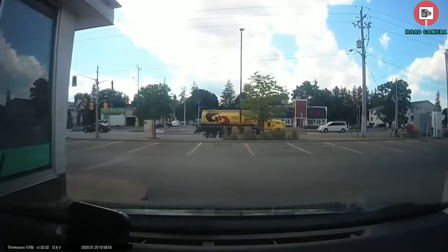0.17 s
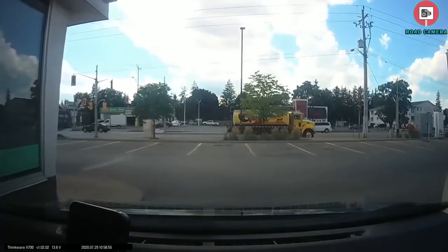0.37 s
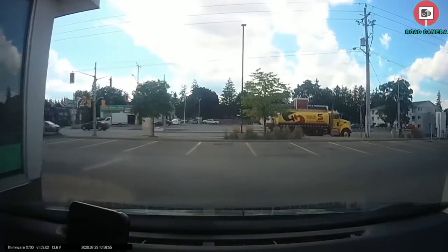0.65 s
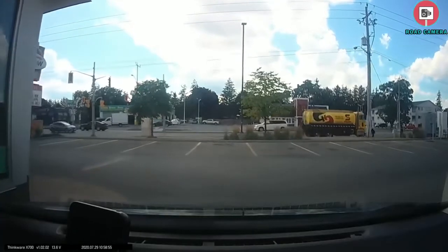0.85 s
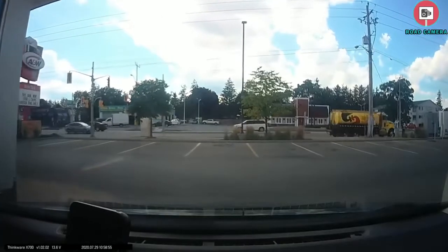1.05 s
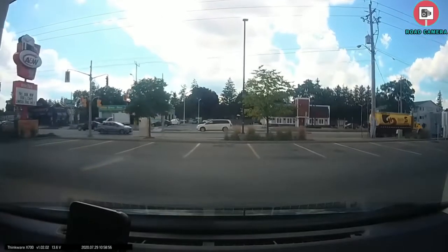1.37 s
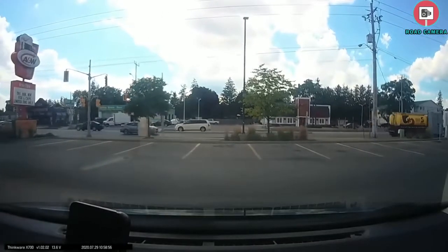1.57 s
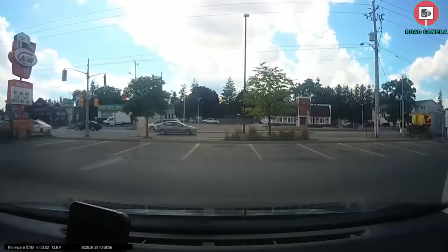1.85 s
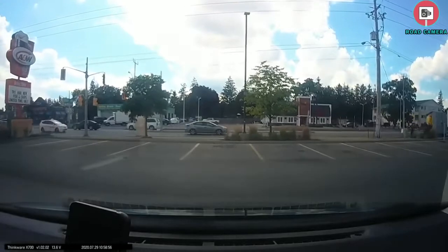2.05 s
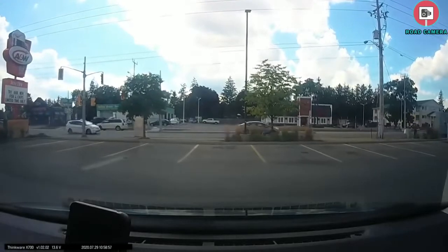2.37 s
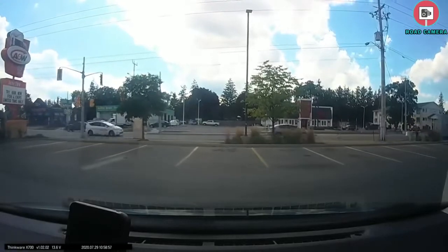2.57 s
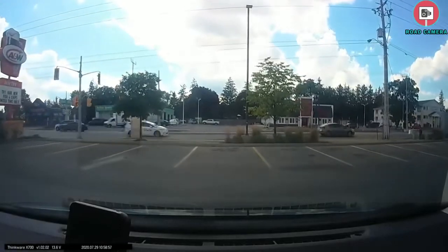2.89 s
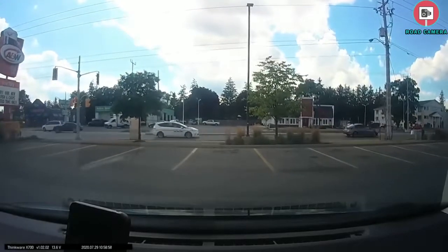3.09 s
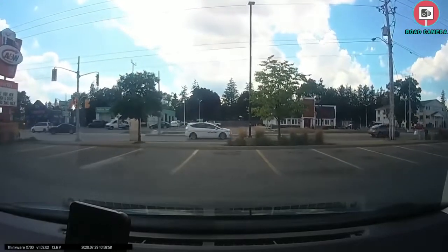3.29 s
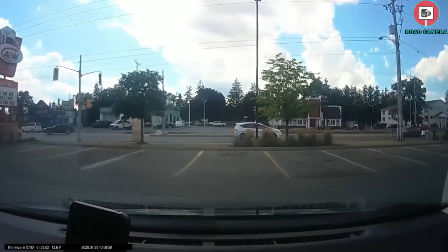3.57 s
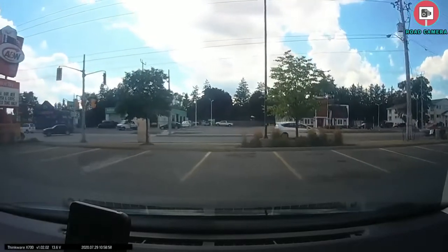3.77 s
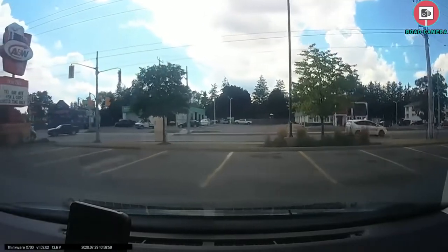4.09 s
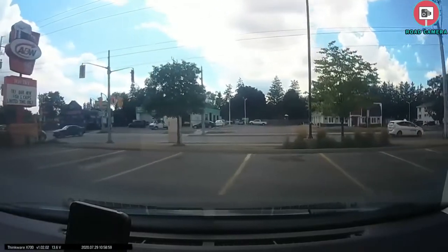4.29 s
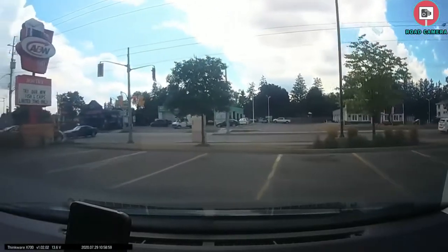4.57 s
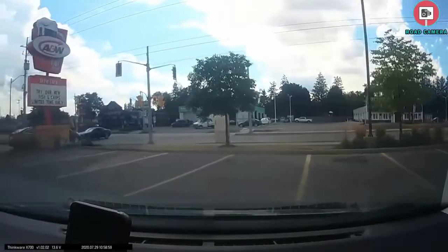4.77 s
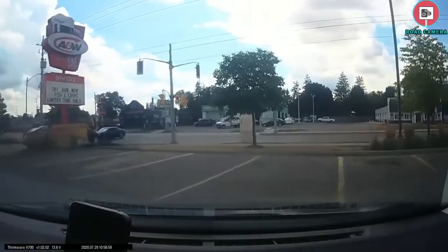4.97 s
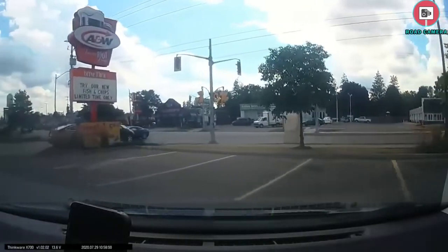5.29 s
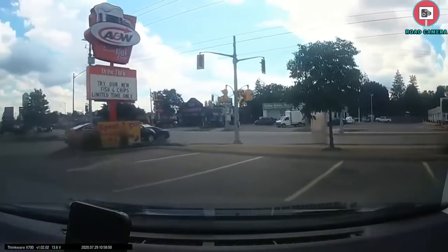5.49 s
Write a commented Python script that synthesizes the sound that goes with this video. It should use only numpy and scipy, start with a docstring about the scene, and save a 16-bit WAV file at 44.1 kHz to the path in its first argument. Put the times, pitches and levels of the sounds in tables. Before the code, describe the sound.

A loud tyre skid ends in a collision, heard through a microphone inside a nearby car. At first there is only the low cabin rumble, a soft engine drone, small plastic ticks and muffled traffic with a passing truck. After about four seconds, tyres outside chirp and build into a wavering, sinking screech. A bumper snaps, body panels crunch with a heavy thud, and the tyres squeal briefly again.

```python
"""A skid and a crash, heard from inside a car

Another car brakes hard. Its tyres stick and slip on the road, so they chirp, screech and fall in pitch.
Its bumper cracks, its body and panels crumple with a deep thud, and the tyres squeal once more.
Underneath, our slowly rolling car rumbles, its engine drones and its loose plastic trim ticks.
Traffic and a passing truck hum outside, and there is a faint hiss and an electrical whine."""
import sys
import numpy as np
from scipy import signal
from scipy.fft import rfft, irfft, next_fast_len
from scipy.io import wavfile
from scipy.ndimage import uniform_filter1d, map_coordinates

SR = 44100
rng = np.random.default_rng(int(sys.argv[2]) if len(sys.argv) > 2 else 0)


def file_out(sig):
    """Save sig as 16-bit WAV at sys.argv[1]."""
    # one column per channel
    cols = np.atleast_2d(sig).T
    # limit, then scale
    lim = np.clip(cols, -1, 1)
    pcm = np.round(lim * 32767).astype(np.int16)
    wavfile.write(sys.argv[1], SR, pcm)


N = 248811

# the skid: t/s, pitch/Hz, sliding force/dB (0 is full force), overtone boost/dB
SKID = [(4.0, 1150, -45.5, 3), (4.36, 1129, -33, -2), (4.47, 1080, -28, -1.5), (4.56, 1022, -25.5, 2),
        (4.66, 965, -11.5, 2.5), (4.71, 922, -5, -10.5), (4.77, 972, -3, -1.5), (4.84, 990, 0, 0),
        (4.9, 915.7, -2.5, -1.5), (4.95, 975, -4, 1), (4.99, 923, -6, 0), (5.04, 938, -8, 4),
        (5.09, 892, -9, 3), (5.15, 865, -11.5, 1), (5.21, 835, -17, 1.5), (5.27, 793, -21, 0),
        (5.32, 830, -22, -1), (5.42, 868, -23, 5)]
# each tyre: pitch ratio, level/dB, overtone/dB, pitch scatter/share,
# change in a light slide/dB, change once the car has slowed/dB
TYRES = [(1, -1.5, -3, .013, 0, 0), (1.052, -6.5, -4.5, .021, -2.5, -6), (.945, -7, -5.5, .018, -10, -2.5),
         (1.15, -11, -7, .028, -4, -4)]
# rubber tearing on asphalt: f/Hz, level/dB
SCRUB_SPECTRUM = [(1000, -79), (1900, -35.5), (2600, -0.5), (2900, -0.5), (3800, -2), (5000, -13),
                  (6500, -19.5), (8000, -20), (9500, -31), (10500, -39), (13000, -47), (15000, -61.5)]
# chattering tread: f/Hz, level/dB
RASP_SPECTRUM = [(300, -70.5), (660, -31), (740, -5.5), (850, 5.5), (1150, 5), (1500, -8), (1780, -10.5),
                 (2250, -8.5), (2600, -13.5), (4000, -43), (12000, -100)]
# a tyre catches briefly: t/s, length/s, pitch/Hz, level/dB, overtone against the note/dB
CHIRPS = [(4.035, 0.072, 1150, -44.5, -25), (4.127, 0.035, 1142, -48, -21), (4.2, 0.033, 1125, -40, -26),
          (4.25, 0.017, 1035, -40, -19), (4.271, 0.023, 1170, -36, -23.5), (4.583, 0.03, 996, -27.5, -21.5),
          (4.74, 0.017, 973, -22, -22.5), (4.829, 0.03, 1020, -26, -10.5), (4.93, 0.029, 1019, -26, -8),
          (5.243, 0.025, 807.6, -39, -3), (5.308, 0.043, 560, -45, -17.5), (5.549, 0.036, 962, -33.5, -20)]
# one tyre's rough squeal: t/s, pitch/Hz, level/dB
JUDDER = [(4.61, 870, -42.5), (4.70, 830, -38), (4.76, 788, -30.5), (4.80, 778, -37.5), (4.84, 795, -31),
          (4.88, 800, -38), (5.0, 785, -38.5), (5.04, 766, -46)]
# crash blows: t/s, thud/dB, panel/dB, splinter/dB, t60/s (the time to fade by 60 dB)
BLOWS = [(5.423, -20, -34, -45, 0.099), (5.431, -18.5, -31.5, -32.5, 0.048), (5.44, -16, -31, -42, 0.052),
         (5.45, -15.5, -21, -43, 0.045), (5.457, -26, -15.5, -35.5, 0.04), (5.466, -18, -26.5, -38, 0.067),
         (5.484, -30, -33.5, -45, 0.1), (5.498, -33, -33.5, -54, 0.18), (5.551, -39.5, -37.5, -56, 0.97)]
# ringing notes of the car body: f/Hz, width/Hz, level/dB
BODY_MODES = [(19.7, 19.4, 1.5), (44.2, 12, 2), (118, 26, -4.5), (193.3, 15, -5), (231, 21.6, -4.5),
              (311, 37, -10), (349, 25, -11.5)]
# ringing notes of the buckling panels: f/Hz, width/Hz, level/dB
PANEL_MODES = [(480, 68, -3.5), (595, 24, 4.5), (746, 27, 7), (887, 50, -0.5), (1086, 125, 1),
               (1270, 102, 1.5), (1455, 77, 0), (2070, 130, -7.5), (2320, 84, -5.5), (2650, 100, -13.5),
               (3310, 160, -14)]
# breaking plastic: f/Hz, level/dB
SPLINTER_SPECTRUM = [(1680, -40), (2400, -1), (3300, -2), (4200, -10), (5500, -12), (6200, -13),
                     (6800, -10), (7300, -19), (8200, -16), (10000, -24), (12000, -34), (15000, -41)]
# how the glass dulls body and panels: f/Hz, gain/dB
GLASS_MUFFLE = [(3000, 0), (6000, -7), (10000, -7), (15000, -45.5)]
# the bumper cracks before the metal gives way: t/s, level/dB
BUMPER_CRACKS = [(5.419, -49), (5.4285, -37), (5.433, -31.5), (5.437, -32)]
# ringing notes of the bumper shell: f/Hz, width/Hz, level/dB
BUMPER_MODES = [(1330, 130, 0), (1670, 110, -4), (2360, 100, -7), (3160, 210, -5.5), (3950, 77, -11.5),
                (5210, 110, -12), (6700, 190, -6.5), (7950, 120, -15.5), (9500, 130, -14.5)]
# deep notes of the cabin air: f/Hz, level/dB
AIR_MODES = [(19, -16.5), (48, -15.5)]
# the street's echo: f/Hz, t60/s
STREET_DECAY = [(100, 0.11), (1000, 0.43), (4000, 0.21), (12000, 0.11)]
# the rolling car's rumble: f/Hz, level/dB
RUMBLE_SPECTRUM = [(10, -16), (20, 6.5), (27, 8), (40, 3), (52, -8), (70, -19.5), (120, -62.5), (300, -130)]
# uneven ground rocks the car: t/s, half width/s, extra rumble/dB
BUMPS = [(.22, 0.49, 6.5), (1.25, 0.21, 5), (2.25, 0.59, 7.5), (3.77, 0.13, 7), (4.301, 0.46, 5),
         (5.62, 0.11, 5.5)]
# our engine pulling away: t/s, firing rate/Hz, drone/dB, overtones/dB
ENGINE = [(0, 24.32, -53.5, -56), (2.2, 24.88, -54.5, -56), (2.8, 27.38, -51.5, -50),
          (3.2, 30.33, -48.5, -49), (3.85, 31, -54.5, -47), (4.15, 36.92, -49, -53),
          (4.8, 38.98, -50.5, -52), (5.08, 47.88, -48, -48.5), (5.35, 52.97, -49, -40),
          (5.64, 56, -39.5, -38.5)]
# the engine's noisy drone: f/Hz, level/dB
DRONE_SPECTRUM = [(45, -28), (65, 7.5), (90, 1.5), (125, -4.5), (160, -9), (220, -9), (300, -20.5),
                  (420, -28), (600, -66.5), (1500, -130)]
# how the cabin passes the engine's overtones: f/Hz, gain/dB
CABIN_RESPONSE = [(50, 0), (75, -2), (92, -2), (115, -11.5), (130, -8.5), (165, -20.5), (210, -11),
                  (260, -16.5), (330, -20), (450, -29)]
# the truck's exhaust booms under load: t/s, length/s, level/dB
TRUCK_SURGES = [(0, 0.12, -50), (0.394, 0.1, -48), (0.578, 0.345, -44.5)]
# loudness of the traffic: t/s, level/dB
TRAFFIC_LEVEL = [(0, -57), (0.3, -54.5), (1.35, -55), (1.85, -57.5), (3.85, -54)]
# traffic through the glass: f/Hz, level/dB
TRAFFIC_SPECTRUM = [(200, -10), (330, -3.5), (420, -11), (510, -2), (680, -5.5), (950, -3.5), (1230, -1.5),
                    (1500, -11.5), (1750, -20.5), (2200, -17.5), (2800, -27), (4500, -49), (12000, -100)]
# ticks of the trim: t/s, level/dB
TICKS = [(.429, -66), (.448, -67), (.579, -69), (.591, -63), (.658, -60), (.691, -69), (1.16, -70),
         (1.438, -70), (1.879, -62), (1.932, -61), (2.038, -56), (2.472, -65), (2.591, -56), (2.808, -67),
         (2.835, -56), (3.67, -63), (3.716, -67), (4.19, -70), (5.037, -55), (5.346, -60)]
# a tick's first contact: f/Hz, width/Hz, level/dB
CONTACT_MODES = [(5700, 700, -6.5), (6860, 1400, 3.5), (8670, 2100, 1)]
# the rattle after a tick: f/Hz, level/dB
RATTLE_SPECTRUM = [(1500, -7), (2700, -3.5), (3400, 4), (4600, -4.5), (6000, -6.5), (8500, -4.5),
                   (11000, -16), (15000, -22)]
# ringing notes of the trim: f/Hz, level/dB, t60/s
TRIM_MODES = [(2200, -2.5, .015), (3540, -1.5, 0.022), (4270, -7.5, 0.013), (8740, -4, .015)]
# faint hiss: f/Hz, level/dB
HISS_SPECTRUM = [(2100, -40), (3000, -1), (3700, 0), (4300, -8), (6400, -8), (7500, -9), (8000, -1),
                 (8600, 0), (9200, -9), (10500, -7), (11700, -14), (12600, -12), (13500, -20), (15000, -32)]
# electrical whine, of which only the overtones sound: t/s, base pitch/Hz
WHINE_PITCH = [(2.85, 2280), (3.15, 2660), (3.4, 2720), (3.62, 2260), (3.86, 1830), (4.08, 2390),
               (4.29, 2120), (4.53, 2460), (4.75, 2330)]

LOCK_S, SLOWED_S, LOOSEN_S = 4.29, 5.03, 5.28  # the squeal turns unbroken, calms, then breaks up
SLIDE_S, SLIDE_HZ, SLIDE_SAG_HZ_PER_S = 5.47, 1065, 880  # the shoved car slides on after the crash
SLIDE_FORCE_DB, SLIDE_FADE_DB_PER_S = -11.5, 44
FULL_HZ, SHARPEN_DB_PER_OCTAVE = 983, 25.5  # slower sticking and slipping has stronger overtones
CHIRP_SAG_HZ_PER_S = 486
TRUCK_HZ, TRUCK_SAG_HZ_PER_S = 133.8, 5  # the truck's firing rate
TRUCK_NEAREST_S, TRUCK_PASS_S = 0.99, 0.91
TOP_HZ = 15400


def tyre_tones(pitch, force_db):
    """Each tyre sticks and slips at its own jittery rate: gives base note, overtone and higher overtones."""
    first, second, upper = np.zeros((3, N))
    light_slide = np.clip((-3 - force_db) / 15, 0, 1)  # the other tyres join in as the slide gets hard
    slowed = ramp(SLOWED_S, 0.056)  # then the leading tyre sings almost alone
    roughness = (1 + .6 * amp(force_db)) * (1 - .3 * slowed)
    for ratio, db, second_db, scatter, light_db, slowed_db in TYRES:
        jitter = scatter * roughness * (.8 * wobble(45) + 1.1 * wobble(320))
        phase = turning(pitch * ratio * (1 + jitter))
        grip = amp(light_db * light_slide + slowed_db * slowed + 1.8 * wobble(40) + 2.1 * wobble(170))
        first += grip * amp(db) * np.sin(phase)
        second += grip * amp(second_db + 2.8 * wobble(60)) * np.sin(2 * phase)
        upper += grip * amp(db) * (np.sin(3 * phase) + .38 * np.sin(4 * phase) + .15 * np.sin(5 * phase))
    return unit(first), unit(second), unit(upper)


def screech(pitch, force_db, bite_db):
    """Sliding rubber sings, rasps and tears on the road; more force adds overtones and scrubbing."""
    squeal_db = -26.5 + 0.31 * force_db
    overtone_db = -31.5 + 0.78 * force_db + SHARPEN_DB_PER_OCTAVE * np.log2(FULL_HZ / pitch)
    scrub_db = -42 + 1.054 * force_db
    loose = ramp(LOOSEN_S, 0.03)  # at low speed the tones weaken and their pitch breaks up
    singing = ramp(LOCK_S, 0.065) * amp(-5 * loose)
    waver = 0.01406 * amp(force_db) * wobble(22) + 0.0553 * loose * wobble(200)
    first, second, upper = tyre_tones(pitch * (1 + waver), force_db)
    overtones = singing * amp(overtone_db + bite_db) * (second + amp(-18) * upper)
    tones = singing * (amp(squeal_db) * first + overtones)
    rasp = amp(overtone_db - 3) * noise(RASP_SPECTRUM)
    scrub = amp(scrub_db + 0.59 * wobble(48)) * noise(SCRUB_SPECTRUM)
    return tones + rasp + scrub


def skid():
    """The tyres screech up to the crash, then again in a short, falling slide."""
    pitch, force_db, bite_db = curves(SKID)
    since = clock() - SLIDE_S
    sliding = since > 0
    pitch = np.where(sliding, SLIDE_HZ - SLIDE_SAG_HZ_PER_S * since, pitch)
    force_db = np.where(sliding, SLIDE_FORCE_DB - SLIDE_FADE_DB_PER_S * since, force_db)
    return np.maximum(during(SKID), sliding) * screech(pitch, force_db, bite_db)


def judder():
    """A hard-pressed tyre squeals lower and rougher than the rest."""
    pitch, db = curves(JUDDER)
    phase = turning(pitch * (1 + 0.0361 * wobble(190)))
    flutter = unit(amp(3 * wobble(130)))
    note = unit(np.sin(phase) + amp(-15.5) * np.sin(2 * phase))
    return during(JUDDER) * amp(db) * flutter * note


def chirps():
    """A tyre catches for a moment and sings one short, sagging note."""
    notes = np.zeros(N)
    jitter = 1 + 0.01598 * wobble(320)
    flutter = amp(2.4 * wobble(170))
    for start, length, hz, db, overtone_db in CHIRPS:
        sag_hz = CHIRP_SAG_HZ_PER_S * np.clip(clock() - start, 0, length)
        phase = turning(jitter * (hz - sag_hz))
        note = unit(np.sin(phase) + amp(overtone_db) * np.sin(2 * phase))
        notes += amp(db) * held(start, length, rise=0.0017, fall=0.014) * note
    return flutter * notes


def crash():
    """Each blow shoves the body, buckles panels and splinters plastic."""
    thud, buckle, splinter = np.zeros((3, N))
    for start, thud_db, panel_db, splinter_db, t60 in BLOWS:
        thud += amp(thud_db) * burst(start, t60, rise=0.00074)
        buckle += amp(panel_db) * burst(start, t60, rise=0.0012)
        splinter += amp(splinter_db) * burst(start, t60, rise=0.0043)
    # a hard contact, then crumpling, sets the metal ringing
    shoves = knocks([(start, db + 16) for start, db, *_ in BLOWS])
    strikes = knocks([(start, db + 17.5) for start, _, db, *_ in BLOWS])
    body = ring(shoves + amp(-2.5) * thud * crunch(swing_db=3.2, rate=900), BODY_MODES)
    panels = ring(strikes + amp(-0.5) * buckle * crunch(swing_db=3.2, rate=900), PANEL_MODES)
    # plastic breaks in about 3500 cracks a second, of very unequal size
    cracking = rng.random(N) < 3500 / SR
    cracks = cracking * rng.standard_normal(N) + .12 * rng.standard_normal(N)
    shards = amp(1.5) * splinter * unit(shaped(cracks, SPLINTER_SPECTRUM))
    return shaped(body + panels, GLASS_MUFFLE) + shards


def bumper():
    """The bumper splits in a few quick snaps, each followed by brief tearing that rings its shell."""
    snaps = knocks([(start, db + 14.5) for start, db in BUMPER_CRACKS])
    tearing = sum(amp(db) * burst(start, t60=.026, rise=.0005) for start, db in BUMPER_CRACKS)
    return ring(snaps + tearing * crunch(swing_db=5, rate=1500), BUMPER_MODES)


def boom():
    """The pressure wave of the crash sets the air in the cabin swinging."""
    start = 5.445
    swing = sum(amp(db) * np.sin(2 * np.pi * hz * (clock() - start)) for hz, db in AIR_MODES)
    return burst(start, t60=0.63, rise=0.0076) * swing


def street_echo(sound):
    """Buildings answer with a smooth echo that lasts longest at middle pitches."""
    hz, t, spectrum = signal.stft(rng.standard_normal(SR // 2), SR, nperseg=256)
    fade = amp(-60 * t / along(STREET_DECAY, hz)[:, None])
    _, tail = signal.istft(spectrum * fade, SR, nperseg=256)
    return signal.fftconvolve(sound, tail / np.linalg.norm(tail))[:N]


def cabin():
    """Our car rumbles and its engine shakes it, both more strongly on uneven ground."""
    level_db = -38.5 + sum(db * np.exp(-((clock() - at) / width) ** 2) for at, width, db in BUMPS)
    sway = signal.hilbert(noise(RUMBLE_SPECTRUM))
    rumble = unit(sway.real / np.sqrt(abs(sway) + .5))  # the largest swings are held back
    return amp(level_db) * rumble + engine(shake_db=level_db)


def engine(shake_db):
    """Our engine shakes the car at its firing rate, with overtones and a noisy drone above."""
    firing_hz, drone_db, overtones_db = curves(ENGINE)
    phase = turning(firing_hz * (1 + 0.0178 * wobble(14)))
    shake = amp(shake_db + 2 * wobble(11)) * np.sin(phase + .6 * wobble(11))
    overtones = np.zeros(N)
    for k in range(2, 10):
        gain = amp(along(CABIN_RESPONSE, k * firing_hz) + 2.67 * wobble(12))
        overtones += gain * np.sin(k * phase + .5 * wobble(13))
    return shake + amp(overtones_db) * overtones + amp(drone_db) * noise(DRONE_SPECTRUM)


def truck():
    """A diesel exhaust hums as the truck passes and booms whenever it pulls."""
    phase = turning((TRUCK_HZ - TRUCK_SAG_HZ_PER_S * clock()) * (1 + 0.01168 * wobble(24.6)))
    load = sum(amp(db) * held(start, length, rise=.019, fall=.06) for start, length, db in TRUCK_SURGES)
    passing = amp(-57.5) / (1 + ((clock() - TRUCK_NEAREST_S) / TRUCK_PASS_S) ** 4)
    first = amp(1.1 * wobble(12.36)) * np.sin(phase)
    second = amp(0.5 + 2.8 * wobble(24.94)) * np.sin(2 * phase)
    fourth = amp(-5 + 0.96 * wobble(14)) * np.sin(4 * phase + wobble(40.26))
    return load * first + (passing + amp(-24.5) * load) * (second + fourth)


def traffic():
    """The noise of other cars comes dully through the glass."""
    level_db, = curves(TRAFFIC_LEVEL)
    return amp(level_db + 0.66 * wobble(10)) * noise(TRAFFIC_SPECTRUM)


def trim_ticks():
    """Loose plastic trim ticks: a bright contact, a short rattle and a ring that differs each time."""
    contact = ring(knocks([(start + .001, db + 16.5) for start, db in TICKS]), CONTACT_MODES)
    rattle = sum(amp(db + 2) * burst(start, t60=.058, rise=.0015) for start, db in TICKS)
    ringing = np.zeros(N)
    t = np.arange(SR // 10) / SR
    for start, db in TICKS:
        for hz, mode_db, t60 in TRIM_MODES:
            detune, strength = rng.standard_normal(2)
            fade = amp(db + mode_db + 3 * strength - 60 * t / t60)
            note = np.sin(2 * np.pi * hz * (1 + .025 * detune) * t)
            ringing[round(start * SR):][:len(t)] += fade * note
    return contact + rattle * noise(RATTLE_SPECTRUM) + ringing


def electronics():
    """A faint hiss and a barely audible electrical whine that wanders in pitch."""
    phase = turning(uniform_filter1d(curves(WHINE_PITCH)[0], size=6500))
    overtones = .7 * np.sin(2 * phase) + .8 * np.sin(3 * phase) + 1.1 * np.sin(4 * phase)
    hiss = amp(-76.5) * noise(HISS_SPECTRUM)
    whine = amp(-89 + 2 * wobble(18)) * during(WHINE_PITCH) * overtones
    return hiss + whine


def amp(db):
    """Turn decibels into a gain."""
    return 10 ** (np.asarray(db) / 20)


def unit(x):
    """Scale to an average power of 1."""
    return x / np.sqrt(np.mean(x ** 2) + 1e-20)


def clock():
    """The time of every sample, in seconds."""
    return np.arange(N) / SR


def turning(hz):
    """The phase of a tone whose pitch moves."""
    return 2 * np.pi * np.cumsum(hz) / SR


def along(points, hz):
    """Read between (f/Hz, value) points on a log frequency scale."""
    f, values = np.transpose(points)
    return np.interp(np.log(hz + 1), np.log(f + 1), values)


def curves(rows):
    """One value per sample for each column after the time."""
    times, *columns = np.transpose(rows)
    return [np.interp(clock(), times, column) for column in columns]


def during(rows, fade=0.029):
    """1 over the time that a table spans, fading to 0 outside it."""
    return np.clip(np.minimum(clock() - rows[0][0], rows[-1][0] - clock()) / fade + 1, 0, 1)


def ramp(start, length):
    """A straight rise from 0 to 1."""
    return np.clip((clock() - start) / length, 0, 1)


def held(start, length, rise, fall):
    """A level that rises, holds and falls."""
    t = clock() - start
    return np.clip(np.minimum(t / rise, 1 + (length - t) / fall), 0, 1)


def burst(start, t60, rise):
    """The level of a blow: it rises quickly and dies away."""
    t = np.maximum(clock() - start, 0)
    return (1 - np.exp(-t / rise)) * amp(-60 * t / t60)


def knocks(rows):
    """One sharp click for each (t/s, level/dB) row."""
    times, db = np.transpose(rows)
    return np.bincount(np.round(times * SR).astype(int), amp(db), N)[:N]


def wobble(rate):
    """A smooth curve through `rate` random points a second."""
    points = rng.standard_normal(int(N * rate / SR) + 4)
    fine = np.arange(0, len(points), 1 / 8)
    return np.interp(clock() * rate, fine, map_coordinates(points, [fine]))


def crunch(swing_db, rate):
    """Noise made grainy by a fast-flickering level."""
    return unit(rng.standard_normal(N) * amp(swing_db * wobble(rate)))


def noise(spectrum):
    """Steady noise with the given spectrum and a power of 1."""
    return unit(shaped(rng.standard_normal(N), spectrum))


def filtered(x, response):
    """Multiply each frequency in x by response(hz)."""
    size = next_fast_len(N + SR // 2)
    return irfft(rfft(x, size) * response(np.fft.rfftfreq(size, 1 / SR)), size)[:N]


def shaped(x, spectrum):
    """Filter x by a curve of (f/Hz, level/dB) points."""
    return filtered(x, lambda hz: amp(along(spectrum, hz)))


def ring(x, modes):
    """Let x ring (f/Hz, width/Hz, level/dB) resonances; white noise would keep its power."""
    def response(f):
        gain = sum((-1) ** k * amp(db) * 1j * f * width / (hz * hz - f * f + 1j * f * width)
                   for k, (hz, width, db) in enumerate(modes))
        return gain / np.sqrt(np.mean(abs(gain) ** 2))
    return filtered(x, response)


def scene():
    """The accident and its echo over the sounds of our car and the street."""
    tyres = skid() + judder() + chirps()
    hit = bumper() + crash()
    echo = street_echo(amp(-9.5) * tyres + amp(-19) * hit)
    accident = amp(-1.5) * tyres + hit + echo + boom()
    background = cabin() + traffic() + truck() + trim_ticks() + electronics()
    return (accident + background)[None]


def record(dry):
    """Cut away the treble above TOP_HZ."""
    return filtered(dry[0], lambda hz: hz < TOP_HZ)[None]


dry = scene()
out = record(dry)
file_out(out)
```